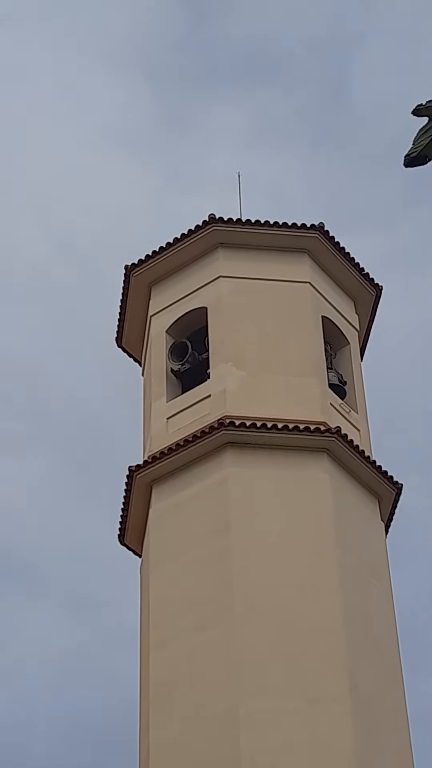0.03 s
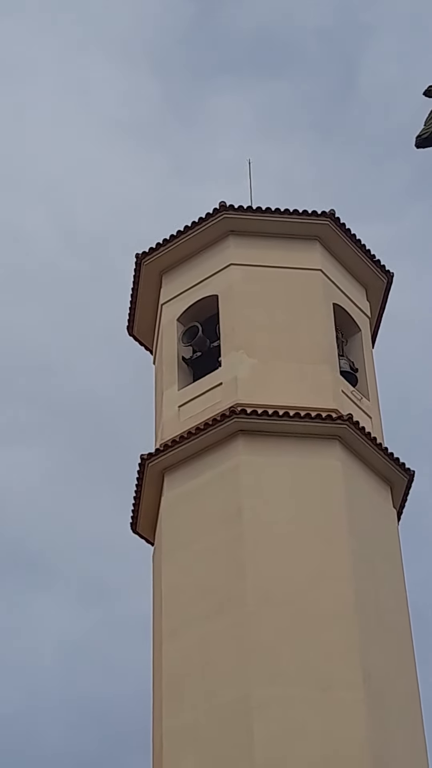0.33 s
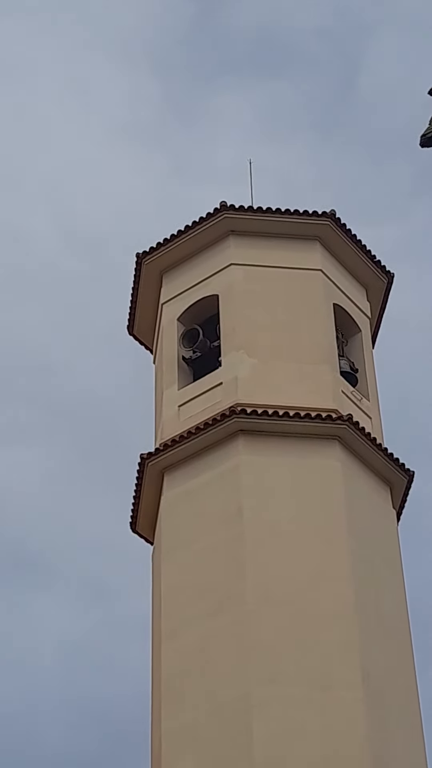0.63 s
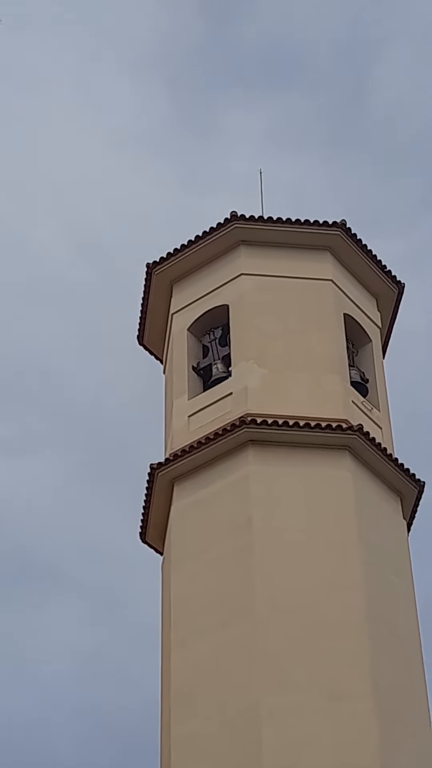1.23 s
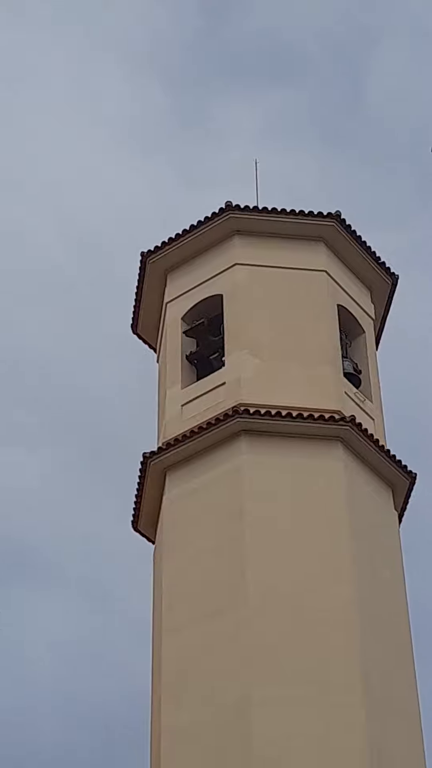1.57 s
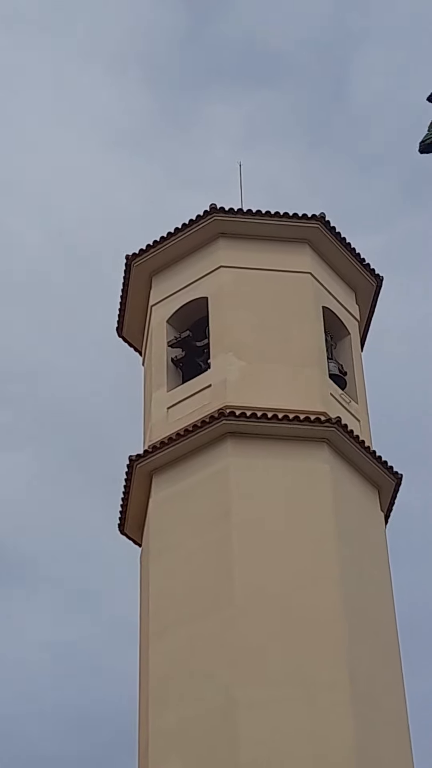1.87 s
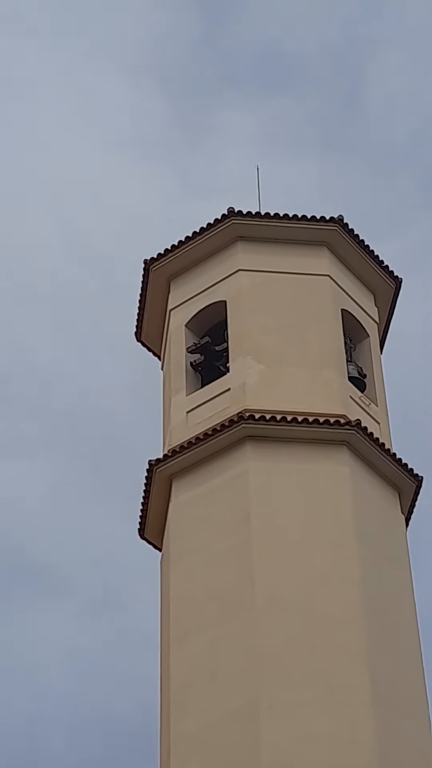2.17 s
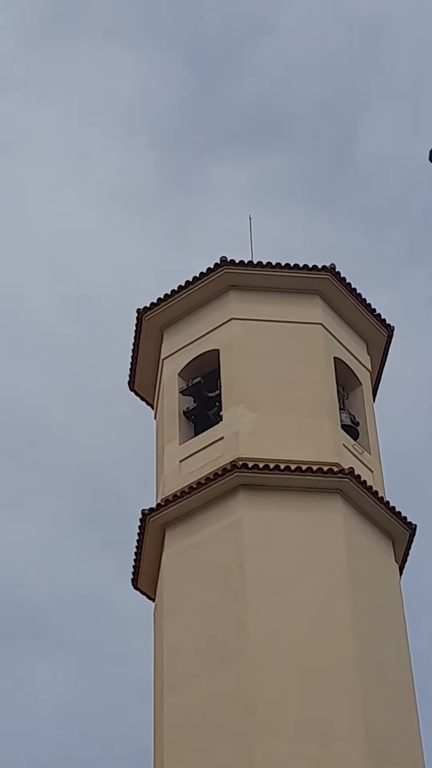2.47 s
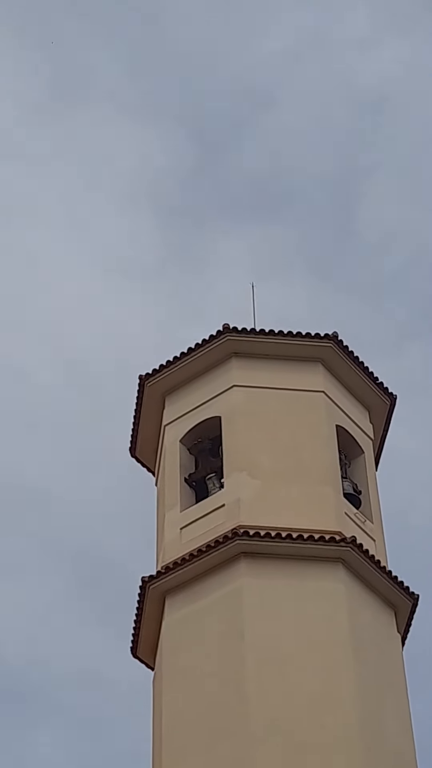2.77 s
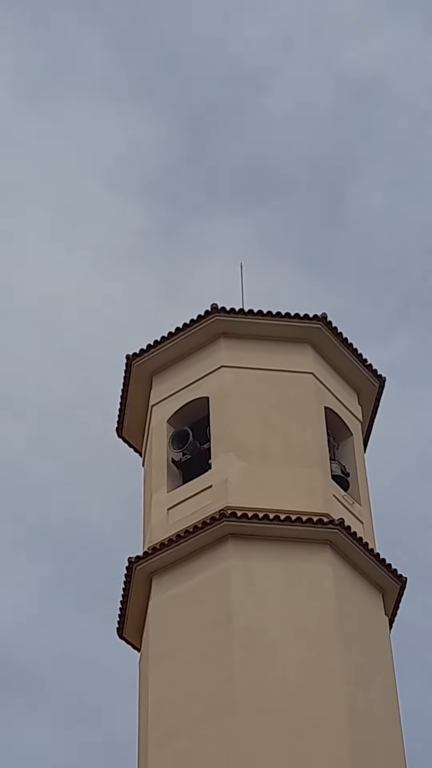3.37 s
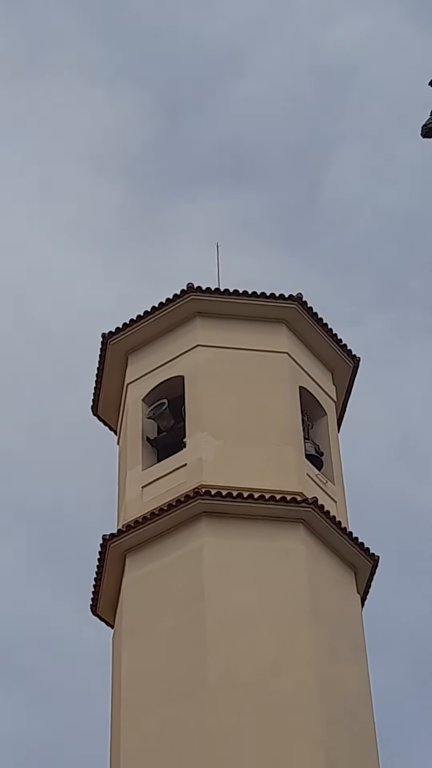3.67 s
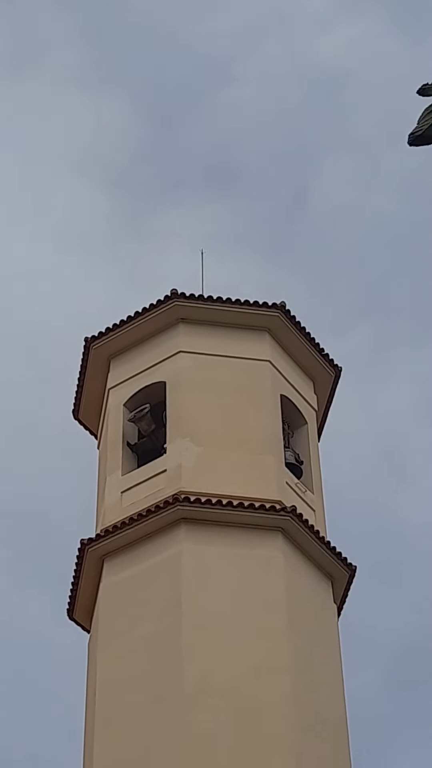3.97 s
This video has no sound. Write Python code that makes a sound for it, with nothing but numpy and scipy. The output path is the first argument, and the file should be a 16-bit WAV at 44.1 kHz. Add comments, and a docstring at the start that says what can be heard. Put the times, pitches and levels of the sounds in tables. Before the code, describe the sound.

A church bell swings in a tower, heard from the street below. It strikes three times, each clang followed by a lighter clapper rebound and a wavering ring. Faint town rumble lies underneath, with a thin insect buzz early on.

```python
"""A street below a church tower. The bell swings full circle: three strokes, each with a lighter
clapper rebound. The turning bell bends its partials slightly and beams them in and out; walls scatter
the ring. Underneath: a low background hum (perhaps another bell), town rumble, faint hiss, a few soft
bumps, one brief rustle, and an insect buzzing high up that soon stops."""
import sys
import numpy as np
from scipy import signal
from scipy.fft import rfft, irfft, next_fast_len
from scipy.io import wavfile
from scipy.ndimage import map_coordinates

SR = 44100
rng = np.random.default_rng(int(sys.argv[2]) if len(sys.argv) > 2 else 0)


def output_pcm(signal):
    """Save a mono or channel-first signal as 16-bit PCM at the path in sys.argv[1].

    Samples are clipped to [-1, 1] before scaling.
    """
    pcm = np.clip(np.atleast_2d(signal).T, -1, 1) * 32767
    wavfile.write(sys.argv[1], SR, np.round(pcm).astype(np.int16))


N = 176400

# Each row: start in seconds, ring in dB, clang in dB, pan L-R in dB, swell in dB, rebound delay in
# seconds, rebound in dB re the stroke, time in seconds at which the mouth turns away.
STROKES = [(-.01, -0.5, -24, -3.5, -3, .293, -9.5, .5), (1.606, 0.5, -19, -4.5, 8, .262, -21, 2.4),
           (3.381, -1, -22, -6.5, -2, .263, -15, 3.84)]
# Hiss and rustle spectrum. Each row: frequency in Hz, relative level in dB.
HISS_SPECTRUM = [(5000, -5), (6700, 8.5), (8000, -10.5), (9500, -2.5), (11500, 3), (15500, -2.5)]


def amp(db):
    """Decibels to gain."""
    return 10 ** (np.asarray(db) / 20)


def unit(x):
    """Scale to rms 1."""
    return x / np.sqrt(np.mean(np.abs(x) ** 2) + 1e-20)


def decay(age_s, t60_s):
    """Gain falling 60 dB in t60_s."""
    return np.exp(-np.log(1000) * age_s / t60_s)


def panned(db):
    """Left and right gains for a level difference."""
    return amp(np.array([[db], [-db]]) / 2)


def treble_octaves(hz, corner_hz=2350):
    """Octaves above the corner, zero below it."""
    return np.log2(np.maximum(hz / corner_hz, 1))


def along(points, hz):
    """Interpolate (Hz, value) points on a log axis."""
    knots_hz, values = np.transpose(points)
    return np.interp(np.log(hz + 1), np.log(knots_hz + 1), values)


def curve(points):
    """Interpolate (s, value) points per sample."""
    return np.interp(np.arange(N) / SR, *np.transpose(points))


def wobble(rate_hz):
    """Smooth random curve, rate_hz knots a second."""
    knots = rng.standard_normal(N // 64)
    at = np.arange(0, N + 32, 32)
    return np.interp(np.arange(N), at, map_coordinates(knots, [at * rate_hz / SR], mode="wrap"))


def flutter(rate_hz):
    """Random amplitude and phase of a scattered tone."""
    return unit(wobble(rate_hz) + 1j * wobble(rate_hz))


def filtered(x, response):
    """Apply a gain given as a function of Hz."""
    size = next_fast_len(N + SR // 4)
    return irfft(rfft(x, size) * response(np.fft.rfftfreq(size, 1 / SR)), size)[..., :N]


def stereo_noise(spectrum):
    """Noise of rms 1, the ears alike in the bass and unrelated in the treble."""
    # Each row: frequency in Hz, left-right correlation.
    coherence = [(300, 0.95), (600, 0.22), (1500, 0.033)]

    def shape(hz):
        angle = np.arccos(np.clip(along(coherence, hz), -1, 1)) / 2
        return amp(along(spectrum, hz)) * [np.cos(angle), np.sin(angle)]
    mid, side = filtered(rng.standard_normal((2, N)), shape)
    return unit(np.array([mid + side, mid - side]))


def blows():
    """Clapper strokes and duller rebounds: stroke index, start s, ring, clang, pan, swell dB, dB/octave."""
    for stroke, (start_s, db, clang_db, pan_db, swell_db, delay_s, rebound_db, _) in enumerate(STROKES):
        yield stroke, start_s, db, clang_db, pan_db, swell_db, 0
        yield stroke, start_s + delay_s, db + rebound_db, clang_db + rebound_db + 5, pan_db, 0, 4


def bell_and_hum(attack_s=.0021, early_s=.065, swell_s=.065, turn_s=1.76, doppler=.0038, beam_hz=8.07):
    """The struck bell's partials decay, bent and beamed by the swing, scattered by walls, over a hum."""
    # Each row: frequency in Hz, t60 in seconds, level in dB at each of the three strokes.
    # Row 0 (261 Hz) is a background hum, perhaps another bell, shaped like the rest: this bell's partials.
    tones = [(261.0, 6.0, -39, -38, -41), (452.0, 6.0, -45, -32, -39), (640.7, 5.5, -28, -27.5, -33.0),
             (1132.0, 4.1, -20.0, -19.0, -20.0), (1194.0, 3.9, -34, -31, -32), (1277.0, 2.8, -40, -34, -38),
             (1301.0, 2.7, -27, -32, -30), (1511.0, 2.5, -29, -29, -25), (1578.0, 2.3, -26.0, -30.0, -20.5),
             (1729.5, 2.7, -24.0, -19.5, -21.5), (1886.0, 2.7, -35, -36, -40), (2130.0, 2.5, -40, -43, -36),
             (2273.0, 2.0, -35, -33, -37), (2402.5, 2.2, -23, -21, -20), (2556.0, 2.1, -33, -28, -31),
             (2601.0, 2.0, -37, -30, -34), (2919.0, 1.7, -35, -33, -33), (3041.0, 2.1, -41, -54, -32),
             (3142.0, 2.2, -28.5, -23.0, -25.0), (3740.0, 1.6, -41, -36, -38), (3932.0, 1.7, -26, -28, -26),
             (4319.0, 1.0, -31, -39, -34), (4666.0, 1.4, -32, -39, -35), (4740.0, 1.4, -27, -25.5, -26),
             (5577.0, 1.3, -34, -33, -34), (6404.0, 1.2, -37, -37, -37)]
    # Beaming of the strongest partials, by tone index. Each row: time in seconds, gain in dB.
    beams = { 2: [(0, -7), (.4, 4), (1.1, 0), (1.28, -10), (1.42, 8), (1.55, -7), (1.73, 1), (1.9, -7),
             (2.03, 2.5), (2.28, -2), (2.4, -11), (2.9, -8), (3.03, 3), (3.15, -7), (3.7, 7), (3.86, -6)],
             3: [(0, -11), (.1, 1), (.26, -2), (.33, 2.5), (.62, -.5), (.72, -11), (1.73, -6), (1.82, 4),
             (1.89, -3), (1.99, 2), (2.12, -11), (2.22, 1), (2.42, -8), (2.56, 2), (2.68, -8), (3.58, -3),
             (3.74, 5), (4, 3.5)], 8: [(0, -9), (.12, 4), (.65, -1), (2.2, -1), (3.38, -7), (3.48, 3.5),
             (3.68, -11), (4, -4)], 9: [(.05, -5), (.18, 4), (.27, -6), (.39, 5), (.85, 0), (1.64, -8),
             (1.73, 2.5), (1.8, -7), (1.91, 2), (2.06, -3), (2.19, 5), (2.5, -7), (2.6, 0), (3.4, -8),
             (3.53, 5), (3.7, 4.5), (3.85, -6)], 18: [(.22, -2), (.45, 5), (.72, 2), (.9, -5), (1.62, -8),
             (1.73, 2), (1.83, 3.5), (1.89, -7), (3.45, -2), (3.53, -5), (3.76, 5), (3.87, 6), (4, -7)], }
    # Stereo wander, by tone index. Each row: time in seconds, pan L-R in dB, left lead in radians.
    drifts = { 2: [(0, 2, 0), (.15, -1, -2.3), (.5, -7, -2.7), (.9, 3, -1), (1.7, 0, .7)], 3: [(.2, 10, -1),
              (.33, -2, .3), (3.45, 3, .8), (3.65, -4, -1.5)], }
    # Each row: frequency in Hz, scattered share of the power before steadying.
    scatter = [(260, 0.062), (1700, 0.76), (6000, 0.4)]
    # Each row: frequency in Hz, pan L-R in dB.
    pan_tilt = [(260, 0.5), (450, 4), (640, 10.5), (1130, 1), (1700, 0.5), (3000, 1.5), (5500, -5)]
    t = np.arange(N) / SR
    lowest_pitch_s, left_lag_s = 1.62, .00005
    heard_s = np.cumsum(1 + doppler * np.sin(np.pi * (t - lowest_pitch_s) / turn_s) ** 2) / SR
    envelopes = []
    for stroke, start_s, db, _, pan_db, swell_db, _ in blows():
        age_s = np.maximum(t - start_s, 0)
        early = np.exp(-age_s / early_s)  # louder and brighter just after the blow
        turning_in = np.exp(-(age_s / swell_s) ** 2)  # falls to 0 as the mouth faces the street
        turned_away = np.clip((t - STROKES[stroke][-1]) / swell_s, 0, 1)
        level_db = db + 3.5 * early - swell_db * turning_in
        tilt_db_per_octave = early - 3.5 * turned_away
        gain = panned(pan_db) * amp(level_db) * (1 - np.exp(-age_s / attack_s))
        envelopes.append((stroke, age_s, tilt_db_per_octave, gain))
    out = np.zeros((2, N))
    for index, (hz, t60_s, *levels_db) in enumerate(tones):
        power = 0
        for stroke, age_s, tilt_db_per_octave, gain in envelopes:
            tone_db = levels_db[stroke] + tilt_db_per_octave * treble_octaves(hz)
            power += (gain * amp(tone_db) * decay(age_s, t60_s)) ** 2
        beam_db = curve(beams[index]) if index in beams else .7 * wobble(beam_hz)
        fading = .12 if index in beams else 1  # the strongest partials arrive mostly direct, steadier
        share = fading * np.clip(along(scatter, hz), 0, 1)
        tone = amp(beam_db) * np.exp(2j * np.pi * (hz * heard_s + rng.random()))
        skirt = amp(-6) * flutter(.021 * hz) / np.sqrt(fading)
        drift_db = drift_rad = 0
        if index in drifts:
            drift = np.array(drifts[index])
            drift_db, drift_rad = curve(drift[:, [0, 1]]), curve(drift[:, [0, 2]])
        for ear, side in enumerate((.5, -.5)):
            jitter_rad = np.sqrt(fading) * .88 * wobble(beam_hz / 2)
            phase_rad = side * drift_rad + jitter_rad + 2 * np.pi * hz * left_lag_s * ear
            direct = np.sqrt(1 - share) * np.exp(1j * phase_rad)
            scattered = np.sqrt(share) * (flutter(.006 * hz) + skirt)
            ear_gain = amp(side * (along(pan_tilt, hz) + drift_db))
            out[ear] += ear_gain * np.sqrt(power[ear]) * (tone * (direct + scattered)).real
    return out


def clang(crash_db=1, crash_t60_s=.33, tail_db=-8.5):
    """The clapper's crash: a dense wash of modes lingering in the belfry, longest in the midrange."""
    # Each row: frequency in Hz, relative level in dB.
    spectrum = [(100, -24), (900, -8), (1400, -2), (2500, -1.5), (4400, -7), (6500, -10.5), (7200, -16),
                (7800, -41), (10500, -31), (15000, -36.5)]
    # Each row: frequency in Hz, t60 in seconds.
    tail_t60 = [(200, 0.55), (1200, 3.3), (3000, 1.9), (6500, 1.68), (10000, 0.65)]
    hz, t, bins = signal.stft(stereo_noise(spectrum), SR, nperseg=128)
    power = 0
    for _, start_s, _, db, pan_db, swell_db, dull_db_per_octave in blows():
        age_s = np.maximum(t - start_s, 0)
        crash = amp(crash_db - swell_db) * decay(age_s, crash_t60_s)
        tail = amp(tail_db) * decay(age_s, along(tail_t60, hz)[:, None])
        gain = amp(db - dull_db_per_octave * treble_octaves(hz))[:, None] * panned(pan_db)[:, None]
        power += (t > start_s) * gain ** 2 * (crash ** 2 + tail ** 2)
    return signal.istft(bins * np.sqrt(power), SR, nperseg=128)[1][:, :N]


def overtones(count=30, low_hz=8700, high_hz=13500, re_clang_db=-31, t60_s=.5):
    """Faint, short-lived high modes glint on every full stroke."""
    t = np.arange(N) / SR
    tones = power = 0
    for _ in range(count):
        hz = low_hz * (high_hz / low_hz) ** rng.random() ** 2
        tones += np.sin(2 * np.pi * (hz * t + rng.random((2, 1))))
    for start_s, _, clang_db, pan_db, *_ in STROKES:
        fade = (t > start_s) * decay(np.maximum(t - start_s, 0), t60_s)
        power += (amp(clang_db + re_clang_db) * panned(pan_db) * fade) ** 2
    return unit(tones) * np.sqrt(power)


def town_rumble():
    """Distant town: low noise, its level wavering."""
    # Each row: frequency in Hz, relative level in dB.
    spectrum = [(25, -32), (37, -9), (50, -3), (90, 1), (180, -9.5), (280, -4.5), (420, -11), (1100, -10.5),
                (1800, -15.5), (3000, -24.5), (7000, -34)]
    # Each row: time in seconds, level in dB.
    levels = [(0, -30.5), (1.2, -32.5), (3.3, -29.5), (4, -31)]
    return amp(curve(levels) + .78 * wobble(9.7)) * stereo_noise(spectrum + [(8000, -58.5)])


def hiss(pan_db=-3):
    """Faint flickering hiss above the rumble."""
    # Each row: time in seconds, level in dB.
    levels = [(0, -58.5), (.9, -62.5), (1.3, -57), (2.7, -55), (3.2, -52), (4, -55.5)]
    flicker_db = .36 * wobble(8.9) + 1.3 * wobble(45)
    return amp(curve(levels) + flicker_db) * panned(pan_db) * stereo_noise(HISS_SPECTRUM)


def bumps():
    """Soft bumps and swells: low tones that rise and fall symmetrically."""
    # Each row: peak time in seconds, peak in dB, frequency in Hz, time constant in seconds.
    events = [(.4, -37.5, 162.4, 0.49), (.58, -25.5, 85, 0.038), (1.078, -25, 88, 0.023),
              (1.85, -34.5, 53.9, 0.41), (2.66, -31, 64.6, 0.055)]
    t = np.arange(N) / SR
    out = np.zeros(N)
    for peak_s, db, hz, fade_s in events:
        envelope = amp(db) * np.exp(-np.abs(t - peak_s) / fade_s)
        out += envelope * np.sin(2 * np.pi * (hz * t + rng.random()))
    return out


def rustle(peak_s=2.947, width_s=.018, db=-48):
    """One brief, high rustle close by."""
    t = np.arange(N) / SR
    return amp(db) * np.exp(-((t - peak_s) / width_s) ** 2) * stereo_noise(HISS_SPECTRUM)


def insect(flutter_hz=91, flutter_db=.5):
    """A thin fluttering buzz in one high resonance."""
    # Each row: frequency in Hz, relative level in dB.
    spectrum = [(8400, -59), (8850, -9.5), (9100, 7), (9350, 11), (9550, -1.5), (9900, -39.5)]
    # Each row: time in seconds, level in dB.
    levels = [(0, -48.5), (.6, -51), (1.17, -55), (1.25, -63), (1.42, -67.5), (1.6, -120)]
    return amp(curve(levels) - flutter_db * wobble(flutter_hz)) * stereo_noise(spectrum)


def scene():
    """The bell over the street."""
    return bell_and_hum() + clang() + overtones() + town_rumble() + hiss() + bumps() + rustle() + insect()


def record(dry):
    """Brick-wall low-pass."""
    return filtered(dry, lambda hz: hz < 15850)


dry = scene()
out = record(dry)
output_pcm(out)
```